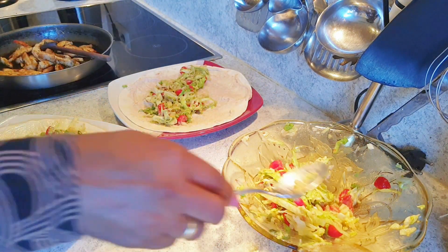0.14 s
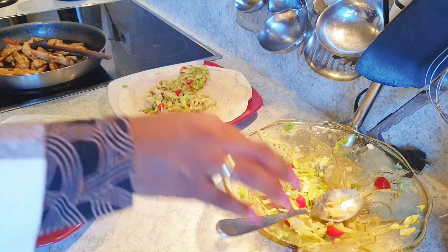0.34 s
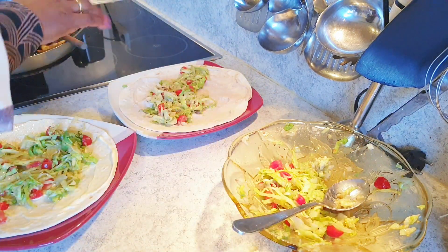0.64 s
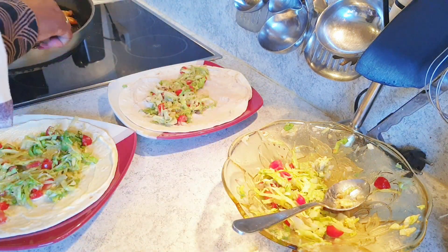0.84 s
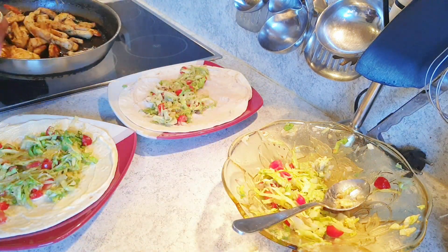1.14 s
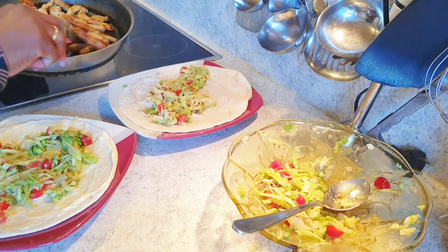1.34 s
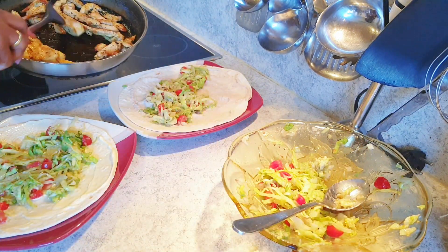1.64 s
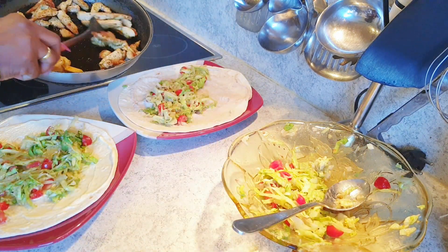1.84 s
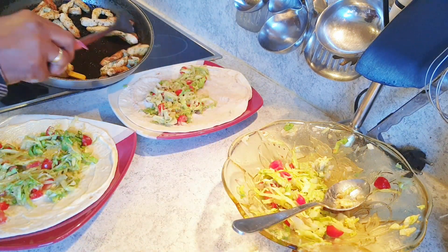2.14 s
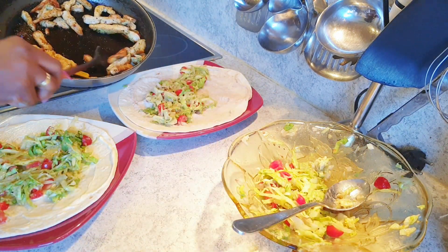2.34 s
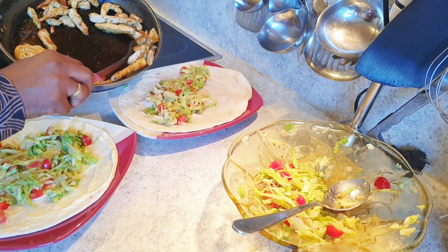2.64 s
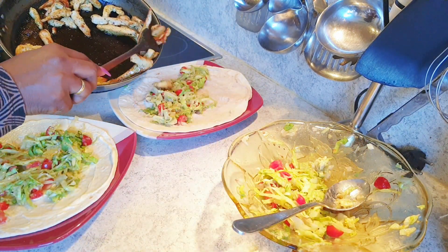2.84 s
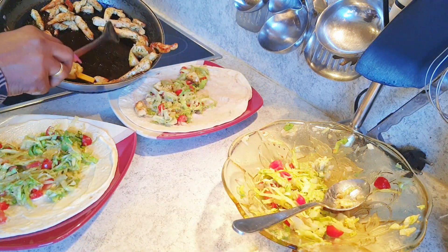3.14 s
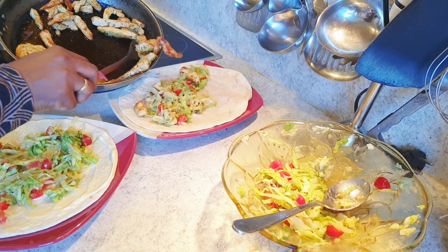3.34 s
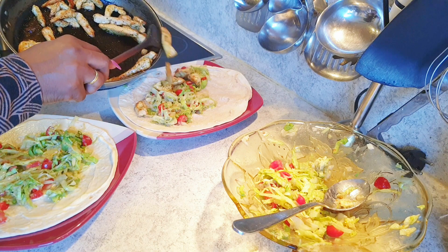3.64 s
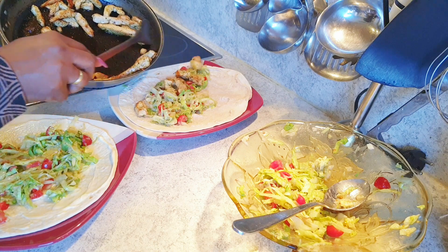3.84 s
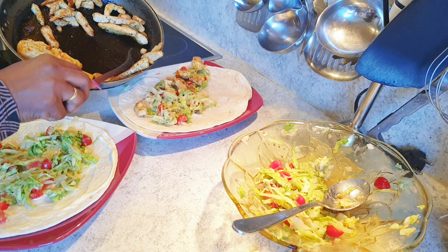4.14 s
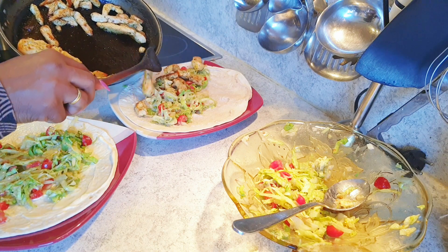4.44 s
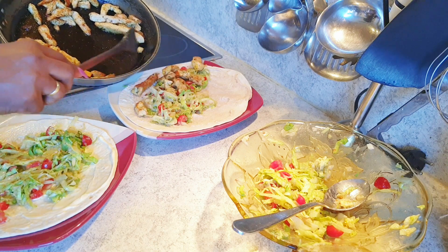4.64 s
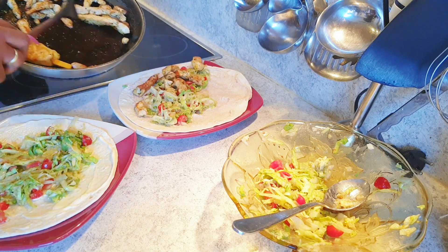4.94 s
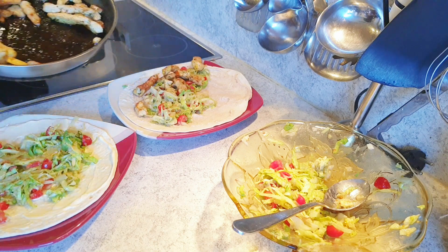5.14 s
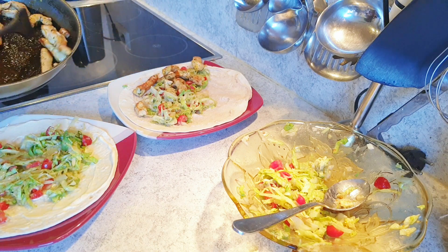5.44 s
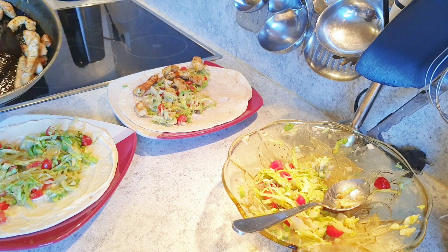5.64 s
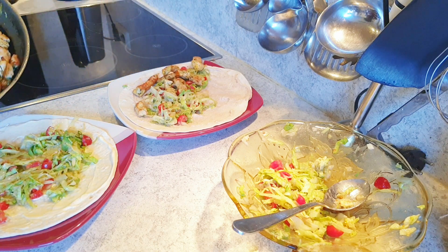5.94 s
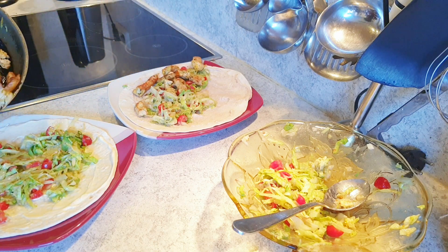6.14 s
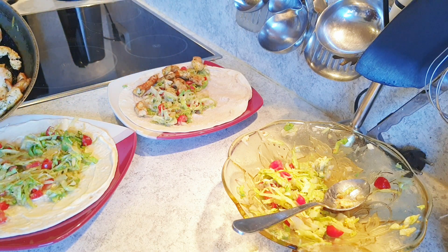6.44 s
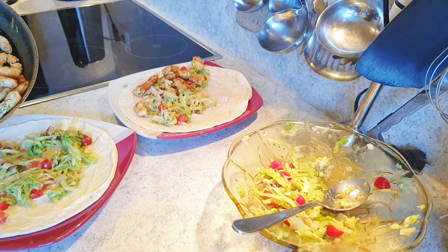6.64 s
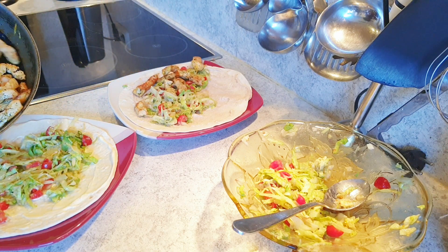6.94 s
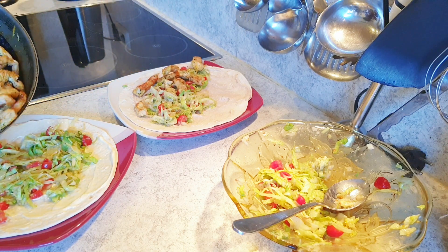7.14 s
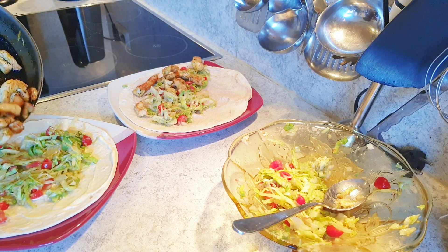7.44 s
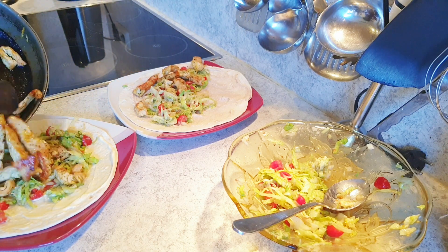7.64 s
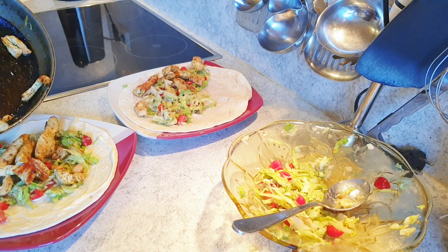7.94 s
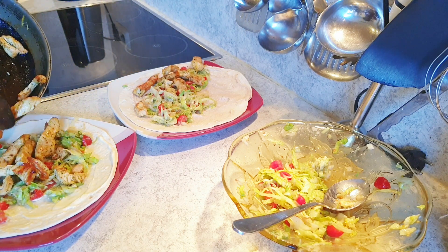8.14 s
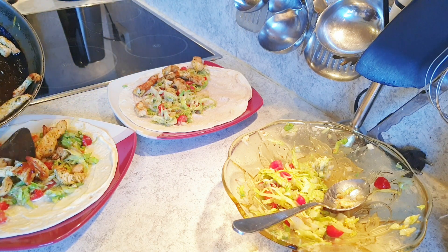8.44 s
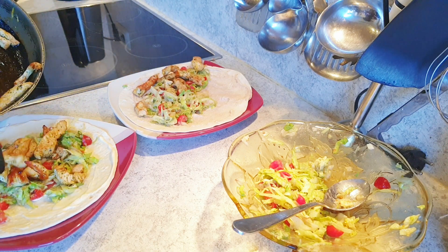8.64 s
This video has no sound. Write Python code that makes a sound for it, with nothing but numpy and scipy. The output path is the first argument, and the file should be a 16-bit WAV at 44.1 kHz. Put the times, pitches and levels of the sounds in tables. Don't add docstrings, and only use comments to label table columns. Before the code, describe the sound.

Stereo phone close to the worktop in a small home kitchen. First comes a fast clinking rattle of spoon against glass, loudest at the start. Spaced metallic pan taps follow, then two strong dull knocks with grating drags on the stovetop. After a short lull, a bright pan clank and several scrapes ring out, ending in faint crisp snaps and soft rustle over quiet refrigerator hum.

```python
import sys
import numpy as np
from scipy import signal
from scipy.fft import rfft, irfft
from scipy.io import wavfile
from scipy.ndimage import uniform_filter1d

SR = 44100
rng = np.random.default_rng(int(sys.argv[2]) if len(sys.argv) > 2 else 0)


def gain_from_db(level_db):
    decades = np.asarray(level_db, float) / 20
    return 10 ** decades


def pcm_store(signal):
    levels = np.round(np.clip(np.atleast_2d(signal), -1, 1) * 32767)
    wavfile.write(sys.argv[1], SR, levels.astype(np.int16).T)


N = 388080

# start_s, peak_db, left_minus_right_db, hardness_0_1, free_ring_s
PAN_TAPS = [(0.65, -36, 0, 0.27, 0.021), (1.093, -21.5, 2, 0.33, 0.029), (1.113, -26.5, -2.5, 0.4, 0.014),
            (1.179, -27, 2, 0.44, 0.065), (1.643, -21.5, 6, 0.22, 0.11), (2.178, -15.5, 5.5, 0.15, 0.021),
            (2.2, -13.5, 1, 0.45, 0.069), (2.315, -29.5, 4, 0.28, 0.09), (5.132, -32, 6, 0.74, 0.1),
            (5.165, -9.5, 0, 0.6, 0.03), (5.454, -16.5, 1, 0.42, 0.036), (5.919, -53.5, 7.5, 0.8, 0.058),
            (6.276, -20, 5.5, 0.29, 0.11), (6.309, -20.5, -1, 0.7, 0.025), (6.795, -20.5, 12, 0.36, 0.059),
            (6.815, -27, 6.5, 0.29, 0.033), (7.005, -49, 5, 0.4, 0.16), (7.141, -38.5, 5, 0.66, 0.038),
            (7.46, -55.5, 16, 0.9, 0.071), (7.894, -54.5, 6.5, 0.22, 0.013)]
# start_s, peak_db, left_minus_right_db, hardness_0_1, thud_hz
HOB_KNOCKS = [(1.364, -48.5, -5, 0.55, 378), (2.572, -2, -3, 0.53, 244.3), (3.197, -1, -9, 0.54, 225),
              (3.893, -26.5, -5.5, 0.28, 299), (3.929, -18, -3, 0.42, 336), (4.25, -29, -1, 0.4, 320),
              (3.454, -22.5, -6, 0.21, 320), (4.306, -20, -3, 0.42, 155.6), (6.276, -16, -2, 0.55, 572),
              (6.795, -22, 3, 0.3, 580), (7.467, -33, 0, 0.03, 151.5), (7.502, -37, 0, 0.07, 167)]


def spoon():
    # start_s, peak_db, left_minus_right_db, hardness_0_1
    spoon_hits = [
        (0.0874, -31.5, -4, 0.56),
        (0.157, -20, -5.5, 0.95),
        (0.191, 0, -5.5, 1),
        (0.2127, -2.5, -2.5, 0.37),
        (0.2454, -3, -3, 0.56),
        (0.2674, -13, -8.5, 0.7),
        (0.2809, -11, 0.5, 0.8),
        (0.3217, -4.5, -8.5, 0.99),
        (0.3366, 0, -2.0, 0.99),
    ]
    clink_db = [-4.5, 4.5, -1, 2, 2, 7, 7, -6, 1]
    # crest_s, level_db, rise_20db_s, fall_20db_s
    rattle = [
        (.191, -17.5, 0, 0.16),
        (.272, -21, 0.08, 0.1174),
        (.336, -16.5, 0.07, 0.13),
    ]
    # pitch_hz, level_db, t60_s, left_lead_rad
    bowl_modes = [(360.6, -23, 0.13, -0.077), (646, -16, 0.17, 0.2), (605, -16, 0.33, -0.46),
                  (817, -10, 0.021, -0.25), (1368, -19, 0.08, 0.84), (2213, -15, 0.21, 0.55),
                  (2263, -14.5, 0.13, -0.61), (2595, -18, 0.13, -0.012), (3153, -15.5, 0.13, 0.027),
                  (3487, -15, 0.047, -0.58), (4210, -7.5, 0.19, 1), (4540, -19, .1, 0.18),
                  (4810, -8, 0.055, -0.039), (5500, -11, 0.091, 0.0036), (5060, -12, 0.06, 0.075),
                  (5480, -10, 0.06, -0.19), (6200, -6, 0.03, 0.059), (6750, -8, 0.066, 0.59),
                  (8430, -14, 0.07, .5), (8870, -15.5, 0.13, -0.83), (10600, -17.5, 0.12, .5),
                  (11650, -15.5, .09, 0.31), (12400, -21, 0.11, -0.26)]
    # pitch_hz, level_db, t60_s, left_lead_rad
    spoon_modes = [(5490, 1, 0.034, 0.95), (5610, -3.5, 0.043, -0.66), (5290, -7, 0.05, .3),
                   (6100, -8, .04, .7), (4240, -8, 0.071, -1.5), (6894, -12, .07, 0.99),
                   (8500, -12, .04, -0.43), (4710, -13, 0.044, .5)]
    free_s = 0.046
    bowl = rings(bowl_modes)

    blows = [(*row, free_s) for row in spoon_hits]
    bowl_ring = strike(blows, bowl, scatter_db=5.5, crack_db=-14, crack_s=0.0027, crack_hz=1420,
                       damped_t60_s=0.3, push_s=0.0004)
    clinks = [(s, db + more_db, pan_db, 1, free_s)
              for (s, db, pan_db, _), more_db in zip(spoon_hits, clink_db)]
    spoon_ring = strike(clinks, rings(spoon_modes), scatter_db=3.5, crack_db=-17.5, crack_s=0.0026,
                        crack_hz=3010, damped_t60_s=0.1, push_s=0.00019)

    force = gain_from_db(-5.0) * joined(strokes(rattle)) * grit(3.2)
    buzz = gain_from_db(0.5) * butter(force * rng.standard_normal((2, N)), 1, 500, "high")
    chatter = rub(force, bowl, contact_t60_s=0.13) + buzz
    return gain_from_db(-4.0) * bowl_ring + gain_from_db(-2.0) * spoon_ring + chatter * sides(-3.0)[:, None]


def pan():
    # pitch_hz, level_db, t60_s, left_lead_rad
    pan_modes = [(928, -17, 0.043, 1), (1033, -11, .15, -.7), (970, -20, .12, 0.96), (935, 5, 0.44, -0.76),
                 (984, -14.5, 0.45, -0.064), (1156, -15, 0.16, -0.25), (1982, -9.5, 0.27, .6),
                 (2008, -4, 0.27, -0.98), (3115, -22.5, 0.39, 0.82), (3107, -22.5, 0.19, -0.46),
                 (4400, -28, 0.15, -0.08), (4880, -32, 0.067, 0.38), (1309, -9, 0.073, 0.68),
                 (644, -23.5, 0.2, 0.085), (1500, -27, 0.05, 0.16)]
    body = rings(pan_modes)
    taps = strike(PAN_TAPS, body, scatter_db=2.0, crack_db=-19.5, crack_s=0.0051, crack_hz=651,
                  damped_t60_s=0.16, push_s=0.0018)
    group = np.digitize(np.array(pan_modes)[:, 0], [1500, 2500])
    slips = grit(3.9)
    rubbing = np.zeros((2, N))
    for k, db in enumerate((-6, -3.5, -6.5)):
        rubbing += rub(gain_from_db(db) * rub_force(k) * slips, body[group == k], contact_t60_s=0.27)
    return butter(taps + rubbing * sides(-0.8)[:, None], 3, 480, "high")


def rub_force(group):
    # start_s, level_db, on_s, second_minus_low_db, highest_minus_low_db
    rubs = [(.65, -45.5, 0.059, -20, -30), (1.095, -35, 0.12, -4.5, -30), (1.645, -25, 0.072, -24, -28.5),
            (1.714, -28.5, 0.046, 4.5, 2.5), (2.176, -21, 0.025, 2, -19), (2.309, -28, 0.035, -13, -11),
            (3.098, -48.5, 0.06, 0.5, 4.5), (3.15, -43.5, .045, -7, -2), (5.124, -36, 0.04, -20.5, -19),
            (5.164, -22.5, 0.012, -1, -6.5), (5.451, -23.5, 0.04, -7, -12), (6.278, -22, 0.084, -3, -3.5),
            (6.39, -23, 0.058, -3.5, -4.5), (6.794, -22.5, 0.04, 0, -6.5), (6.87, -45.5, 0.31, 1, -5),
            (7.885, -54.5, 0.11, -16.5, -19.5), (7.654, -64.5, 0.022, 7.5, 16.5),
            (7.46, -60.5, 0.026, 3.5, -2)]
    sag_db_per_s, lift_db_per_s = 40.5, (240, 176.5, 268.5)
    bite_db, bite_s = 0, 0.068
    s, db, on_s, *upper_db = (c[:, None] for c in np.transpose(rubs))
    since_s = np.arange(0, N, 16) / SR - s
    db = db - sag_db_per_s * np.clip(since_s, 0, on_s)
    db = db - lift_db_per_s[group] * np.maximum(since_s - on_s, 0)
    if group:
        db = db + upper_db[group - 1] + bite_db * np.clip(1 - since_s / bite_s, 0, 1)
    return joined(gain_from_db(db) * (since_s >= 0))


def hob():
    # pitch_hz, level_db, t60_s, left_lead_rad
    plate_modes = [(166, -2.5, 0.066, 0.51), (236, -1.5, 0.023, -0.19), (284, -5.5, 0.023, -0.045),
                   (324, -5, 0.12, -0.095), (379.4, -6.5, 0.04, 0.37), (486.4, -7, 0.032, -1.2),
                   (647, -15, 0.068, -0.49), (816, 5, 0.082, 0.77), (968, -4, 0.1, -0.53),
                   (1051, -4.5, 0.17, 0.32), (1190, -6, 0.038, 0.9), (1682, -14, 0.18, -0.8),
                   (1950, -18, 0.25, -0.46), (2600, -17, 0.14, -0.48), (2750, -5, 0.047, 0.91),
                   (3720, -10, 0.15, 0.69), (4065, -24.5, 0.05, 1), (4888, -9.5, 0.075, -0.47)]
    # crest_s, level_db, rise_20db_s, fall_20db_s
    drags = [(2.573, -21.5, 0, 0.14), (2.85, -48, 0.32, 0.22), (3.197, -22.5, 0, 0.16),
             (3.37, -28, 0.084, 0.0838), (3.56, -41, 0.26, 0.24), (3.46, -37, 0.09, 0.11),
             (3.71, -41, 0.41, 0.11), (3.895, -35, 0, 0.22), (3.95, -32, -0.15, 0.25),
             (4.33, -31.5, 0.1145, 0.1339), (7.475, -65.5, 0.9, 0.8)]
    # pitch_hz, level_db, t60_s, left_lead_rad
    bottom_modes = [(159.3, -3.5, 0.21, -0.6), (237, -11, .08, -0.12), (320, -8.5, 0.25, -0.29),
                    (377, -9.5, 0.1, -0.5), (475, -9.5, 0.068, -1.2), (648, -16, 0.13, 0.018),
                    (812, -7, 0.086, 1), (899, -7, 0.075, -0.98), (988, -8.5, 0.08, 1),
                    (1053, -12, 0.082, -0.79), (1157, -17, 0.095, 1), (1655, -12, 0.09, -0.72),
                    (1993, -20, 0.13, 0.41), (2640, -16, 0.0642, -0.78)]
    free_s = 0.049
    knocks = [(*row[:-1], free_s) for row in HOB_KNOCKS]
    out = strike(knocks, rings(plate_modes), scatter_db=1.5, crack_db=-7, crack_s=0.0041, crack_hz=298,
                 damped_t60_s=0.22, push_s=0.0006)
    force = joined(strokes(drags)) * grit(2.5)
    out += rub(force, rings(bottom_modes), contact_t60_s=0.14) * sides(-5.0)[:, None]
    for s, db, *_, hz in HOB_KNOCKS:
        add_at(out, s, rings([(hz, db - 10.5, 0.13, 0.1)])[0])
    return out


def scrape():
    # crest_s, level_db, rise_20db_s, fall_20db_s, blade_flatness_db
    stir = [(.01, -60.5, 0.11, 0.53, 9.5), (0.089, -51.5, 0.0099, 0.15, 5), (.64, -57, 0.11, 0.25, 0),
            (1.19, -47, 0.079, 0.13, -2), (1.74, -31.5, 0.066, 0.11, 0.5), (2.2, -37, 0.014, 0.13, 2.5),
            (2.316, -38, 0.072, 0.13, 0.5), (2.511, -48, 0.06, 0.11, -8.5), (2.572, -46, 0, 0.18, 11.5),
            (2.825, -51.5, 0.0044, 0.3, -13), (3.104, -49, 0, 0.21, -2), (3.185, -37, 0.069, 0.13, 3),
            (3.35, -43, 0.15, 0.13, 0), (3.518, -43.5, 0.094, 0.099, -2), (3.66, -62, 0.19, 0.16, -2),
            (3.76, -62.5, 0.12, 0.062, 10.5), (3.933, -39.5, 0.012, 0.057, -1.5),
            (4.036, -33.5, 0.11, 0.077, -5.5), (4.16, -49, 0.26, 0.37, -0.5), (4.33, -63, 0.12, 0.099, -7)]
    # crest_s, level_db, rise_20db_s, fall_20db_s, blade_flatness_db
    serve = [(4.76, -66, .09, .08, 12), (7.76, -62, .06, .07, 5), (8.72, -70, .05, .3, 11),
             (5.18, -47, 0.0766, 0.21, 2.5), (5.46, -56.5, 0.04, 0.6, -0.5), (5.535, -55, 0.05, 0.4, 4),
             (5.8, -54, 0.2, 0.3, 3), (6.278, -42.5, 0, 0.24, 1), (6.409, -40.5, 0.03, 0.11, 4.5),
             (6.732, -61, 0.13, 0.08, 7.5), (6.817, -41.5, 0.01, 0.1153, 8), (7.051, -49, 0.5, 0.37, -10.5),
             (7.198, -51.5, -0.3, 0.25, -19), (7.34, -52, 0, 0.04, -19), (7.49, -56, 0.25, 0.32, -6),
             (7.656, -42.5, 0, 0.1, -15), (7.946, -49.5, 0.18, 0.11, -7.5)]
    # crest_s, level_db, rise_20db_s, fall_20db_s
    hollow_strokes = [
        (6.278, -35, 0, 0.13),
        (6.44, -42.5, 0.15, 0.1),
        (6.8, -31.5, 0, 0.1178),
        (7.03, -52, 0.5, 0.09),
        (7.146, -45.5, 0, 0.04),
        (7.91, -60, -0.37, 0.15),
        (.66, -57, 0, 0.13),
        (2.33, -53, 0.2, 0.7),
    ]
    # crest_s, level_db, rise_20db_s, fall_20db_s
    boom_strokes = [
        (.01, -50, .1, -0.13),
        (1.11, -56, 0.02, 0.08),
        (1.375, -56, -0.04, -0.16),
        (1.66, -55, 0.07, 0.36),
        (1.85, -70.5, -0.4, 0.24),
        (2.2, -59, 0.13, 0),
        (2.36, -51.5, 0.23, 0),
        (4.07, -43.5, -0.2, 0),
        (5.18, -47, -0.08, 0.13),
        (5.47, -56, -0.04, 0.18),
    ]
    # pitch_hz, level_db_per_hz
    hiss_colour = [(3500, -28), (5200, -1.5), (7000, -3), (9700, -5), (12000, -4), (15000, -10.5),
                   (16200, -35)]
    rasp_colour = [(1800, -17), (2800, -0.5), (3900, 1.5), (4900, -2.5), (6200, -31)]
    body_colour = [(300, -31.5), (520, 0), (800, 4), (1100, 4), (1500, 3), (2400, -2.5), (3200, -38)]
    hollow_colour = [(260, -19.5), (390, -2), (680, 1), (1200, -25.5)]
    boom_colour = [(230, -30), (320, 0), (385, -1), (480, -30)]
    rasp_db, body_db = -4.5, -15

    rows = np.array(stir + serve)
    gains = strokes(rows)
    flat = joined(gains * gain_from_db(rows[:, -1:]))
    shakes = []
    for blows, more_db, fall_s in ((PAN_TAPS, -23.5, 0.12), (HOB_KNOCKS, -26, 0.11)):
        for s, db, _, hard, _ in blows:
            shakes.append((s, db + more_db + 20 * np.log10(hard), 0, fall_s))
    shudder = joined(strokes(shakes))

    slips = patchy(grit(5.1) + 3.4 * rng.standard_normal((2, N)), patchy_db=2.8)
    hiss = joined(gains) * colour(slips, hiss_colour)
    rasp = gain_from_db(rasp_db) * flat * colour(slips, rasp_colour)
    body = gain_from_db(5.5) * np.hypot(gain_from_db(body_db) * flat, shudder) * colour(slips, body_colour)
    hollow = joined(strokes(hollow_strokes)) * colour(slips, hollow_colour)
    boom = joined(strokes(boom_strokes)) * colour(slips, boom_colour)
    return gain_from_db(2.0) * sides(-0.98)[:, None] * (hiss + rasp + body + hollow + boom)


def notes():
    # crest_s, level_db, rise_20db_s, fall_20db_s, pitch_hz
    bottom_notes = [(2.86, -48, -0.9, -0.06, 164.6), (3.201, -28, 0, -0.1, 1150),
                    (3.205, -28, 0, -0.03, 1950), (3.35, -41, 0, .1, 1004), (3.393, -39, 0.33, -0.2, 814),
                    (3.312, -30, .07, .08, 322), (3.375, -29, .08, .07, 316), (3.47, -37, .06, .08, 320),
                    (3.582, -40, .07, .09, 314), (3.654, -39, .08, .13, 322), (3.94, -35, .04, .06, 330),
                    (4.043, -34, .04, .06, 387), (4.203, -46, .1, .06, 387), (4.335, -32, .07, .1, 318),
                    (3.503, -45, .03, .07, 925), (4.032, -50, .1, .03, 1970), (4.162, -52, .07, .05, 829),
                    (4.316, -39, .03, .07, 904), (4.345, -33, .07, .04, 150), (4.415, -47, .12, .03, 1001),
                    (7.541, -49, .1, .04, 150), (3.95, -41, .04, .05, 980), (3.199, -30, 0, .06, 900),
                    (2.574, -34, 0, .03, 2790), (2.59, -45, 0.04, 0.17, 3720)]
    # crest_s, level_db, rise_20db_s, fall_20db_s, pitch_hz
    wall_notes = [(1.69, -33, .025, .09, 927), (1.9, -55, .1, .1, 1965), (1.39, -60, .05, .07, 927),
                  (5.349, -53, .12, .11, 2024), (5.756, -61, .06, .1, 1690), (6.02, -60, .08, .05, 610),
                  (6.319, -34, .025, .04, 3133), (6.425, -32, .06, .09, 927), (6.827, -28, .016, .07, 925),
                  (6.911, -44, .03, .04, 3122), (6.62, -56, .06, .09, 2024), (7.163, -55, .02, .07, 376),
                  (7.422, -55, .012, .05, 5598), (7.94, -57, .1, .1, 850)]
    # crest_s, level_db, rise_20db_s, fall_20db_s, pitch_hz
    bowl_notes = [
        (.205, -24, .02, .05, 3140),
        (.255, -25, .02, .07, 3140),
        (.27, -28, .04, .05, 6840),
        (.345, -24, .02, .06, 4204),
    ]
    left_lead_rad = 0.44 * np.array([[1], [-1]])
    rows = bottom_notes + wall_notes + bowl_notes
    out = np.zeros((2, N))
    for (s, *_, hz), gain in zip(rows, strokes(rows)):
        near = np.arange(max(int((s - 0.3) * SR), 0), int((s + 0.3) * SR))
        wave = np.sin(2 * np.pi * hz * near / SR + left_lead_rad)
        out[:, near] += np.sqrt(2) * np.interp(near / 16, np.arange(len(gain)), gain) * wave
    return out


def ticks():
    # start_s, peak_db, centre_hz, left_minus_right_db
    snaps = [(0.2451, -10, 6020, -6), (.3217, -12, 7690, -2), (0.1571, -23.5, 5980, -5),
             (0.1908, -4.5, 7950, -6), (3.929, -25.5, 6500, -6.5), (7.298, -46, 6130, -2),
             (7.894, -41.5, 5760, 0), (7.937, -36, 5400, 0), (2.4951, -29, 5300, -3),
             (2.8235, -40.5, 5770, -2), (3.1007, -37, 4480, -5), (7.4055, -30.5, 5710, 1),
             (7.5108, -38, 9340, -1), (7.5971, -36, 5870, 0), (7.653, -21.5, 5500, 2)]
    out = np.zeros((2, N + 4000))
    fade = np.exp(-np.arange(4000) / SR / 0.0078)
    for s, db, hz, pan_db in snaps:
        spectrum = [(1500, -30), (hz * 0.75, -12), (hz, 0), (15000, -5)]
        snap = colour(rng.standard_normal((2, 4000)), spectrum)
        add_at(out, s, gain_from_db(db - 5.0) * sides(pan_db)[:, None] * snap * fade)
    return out[:, :N]


def thumps():
    # start_s, peak_db, pitch_hz, t60_s
    blows = [
        (0.193, -32, 62.6, 0.36),
        (.196, -36, 37.8, .25),
        (2.573, -27.5, 95, 0.18),
        (6.278, -41.5, 134, .3),
    ]
    out = np.zeros((2, N))
    for s, db, hz, t60_s in blows:
        add_at(out, s, rings([(hz, db, t60_s, 0.1)])[0] * sides(-3.0)[:, None])
    return out


def kitchen(x):
    bass_t60_s, treble_t60_s, room_db, onset_s = 0.23, 0.089, -6, 0.0046
    t = np.arange(int(0.4 * SR)) / SR
    noise = rng.standard_normal((2, len(t)))
    noise[1] = noise[0] + butter(noise[1] - noise[0], 1, 350, "high")
    bass = butter(noise, 1, 2500, "low")
    tail = bass * gain_from_db(-60 * t / bass_t60_s) + (noise - bass) * gain_from_db(-60 * t / treble_t60_s)
    tail *= np.minimum(t / onset_s, 1)
    tail *= gain_from_db(room_db) / np.sqrt(np.mean(np.sum(tail ** 2, 1)))
    return x + signal.oaconvolve(x.mean(0)[None], tail, axes=1)[:, :N]


def fridge():
    # pitch_hz, level_db
    hum_lines = [(48.4, -64), (96.9, -58), (199.2, -71)]
    # pitch_hz, level_db_per_hz
    air_colour = [(15, -50), (28, -30), (102, -5.5), (127, -16.5), (206, -17), (229, -28.5), (317, -23.5),
                  (451, -30), (503, -30), (840, -34.5), (1070, -41), (14800, -43.5), (16000, -38.5)]
    t = np.arange(N) / SR
    waver = uniform_filter1d(rng.standard_normal((len(hum_lines), N)), 3000, axis=1) * np.sqrt(3000)
    hum = np.zeros(N)
    for (hz, db), w in zip(hum_lines, waver):
        hum += np.sqrt(2) * gain_from_db(db + 2.5 * w) * np.sin(2 * np.pi * hz * t + 0.46 * w)

    mid, side = colour(rng.standard_normal((2, N)), air_colour)
    side = butter(side, 1, 120, "high")
    air = gain_from_db(-57) * (mid + side * np.array([[1], [-1]]))

    duck_db, duck_at_s, duck_takes_s = -9, 0.63, 0.3
    recover_at_s, recover_takes_s = 1.6, 0.58
    dip = np.clip((t - duck_at_s) / duck_takes_s + 0.5, 0, 1)
    recovery = np.clip((t - recover_at_s) / recover_takes_s + 0.5, 0, 1)
    return (gain_from_db(3.5) * hum + air) * gain_from_db(duck_db * (dip - recovery))


def rings(modes):
    hz, db, t60_s, lead_rad = (c[:, None, None] for c in np.transpose(modes))
    t = np.arange(int(0.35 * SR)) / SR
    decay = gain_from_db(db - 60 * t / np.clip(t60_s, 0.02, 0.45))
    return decay * np.sin(2 * np.pi * hz * t + lead_rad * np.array([[1], [-1]]))


def strike(hits, body, scatter_db, crack_db, crack_s, crack_hz, damped_t60_s, push_s):
    out = np.zeros((2, N + body.shape[-1]))
    chance = rng.standard_normal((len(hits), len(body)))
    t = np.arange(body.shape[-1]) / SR
    push = 1 - np.exp(-t / max(push_s, 1e-4))
    for (s, db, pan_db, hard, free_s), c in zip(hits, chance):
        ring = np.tensordot(gain_from_db(scatter_db * c), body, 1)
        ring *= gain_from_db(-60 * np.maximum(t - free_s, 0) / damped_t60_s)
        ring *= push / np.abs(ring).max()
        crack = butter(rng.standard_normal((3, 3000)), 2, crack_hz, "high")
        ring[:, :3000] += gain_from_db(crack_db) * (crack[0] + crack[1:]) * np.exp(-t[:3000] / crack_s)
        soft = np.exp(-np.clip(hard, 0.1, 1) ** 2 * 1.83)
        ring = signal.lfilter([1], [1, -2 * soft, soft ** 2], ring)
        add_at(out, s, gain_from_db(db) * sides(pan_db)[:, None] * ring / np.abs(ring).max())
    return out[:, :N]


def rub(force, body, contact_t60_s):
    ring = body.sum(0) * gain_from_db(-60 * np.arange(body.shape[-1]) / SR / contact_t60_s)
    ring /= np.sqrt(np.mean(np.sum(ring ** 2, 1)))
    return signal.oaconvolve(force[None], ring, axes=1)[:, :N]


def strokes(rows):
    s, db, rise_s, fall_s = (c[:, None] for c in np.transpose(rows)[:4])
    since_s = np.arange(0, N, 16) / SR - s
    swell = -since_s / np.maximum(rise_s, 0.001)
    fade = since_s / np.maximum(fall_s, 0.01)
    away = np.where(since_s < 0, swell, fade)
    return gain_from_db(db - 20 * away ** 1.4)


def joined(gains):
    total = np.sqrt(np.sum(gains ** 2, 0))
    return np.interp(np.arange(N) / 16, np.arange(gains.shape[1]), total)


def grit(spread_db):
    size = np.minimum(rng.exponential(size=N // 40 + 1), 4)
    x = rng.standard_normal(N) * gain_from_db(spread_db * np.repeat(size, 40)[:N])
    return x / np.sqrt(np.mean(x ** 2))


def patchy(x, patchy_db):
    spec = signal.stft(x, nperseg=512)[2]
    field = uniform_filter1d(rng.standard_normal(spec.shape[1:]), size=7, axis=0)
    field = uniform_filter1d(field, size=5, axis=1)
    return signal.istft(spec * gain_from_db(patchy_db * field / field.std()), nperseg=512)[1][:, :N]


def shape(x, points):
    hz, db = np.transpose(points)
    f = np.maximum(np.fft.rfftfreq(x.shape[-1], 1 / SR), 1)
    return irfft(rfft(x) * gain_from_db(np.interp(np.log(f), np.log(hz), db)), x.shape[-1])


def colour(x, points):
    y = shape(x, points)
    return y / np.sqrt(np.mean(y ** 2))


def butter(x, order, hz, kind):
    return signal.lfilter(*signal.butter(order, hz, kind, fs=SR), x)


def sides(pan_db):
    return gain_from_db(np.array([pan_db, -pan_db]) / 2)


def add_at(out, s, sound):
    start = int(s * SR)
    out[:, start:start + sound.shape[1]] += sound


def scene():
    counter = spoon() + pan() + hob() + scrape() + ticks()
    return kitchen(butter(counter, 2, 90, "high")) + notes() + thumps() + fridge()


def top_cut(x):
    return signal.sosfilt(signal.butter(12, 16290, fs=SR, output="sos"), x)


def record(dry):
    # pitch_hz, level_db
    mic_response = [(8900, 0), (9700, -4.5), (10500, -1), (14300, -0.5), (15200, -8), (15700, -24),
                    (16400, -45)]
    left = dry[0] - 0.53 * butter(dry[0], 1, 447, "low")
    heard = shape(np.array([left, dry[1]]), mic_response)
    return top_cut(np.clip(heard, -1, 1))


dry = scene()
out = record(dry)
pcm_store(out)
```